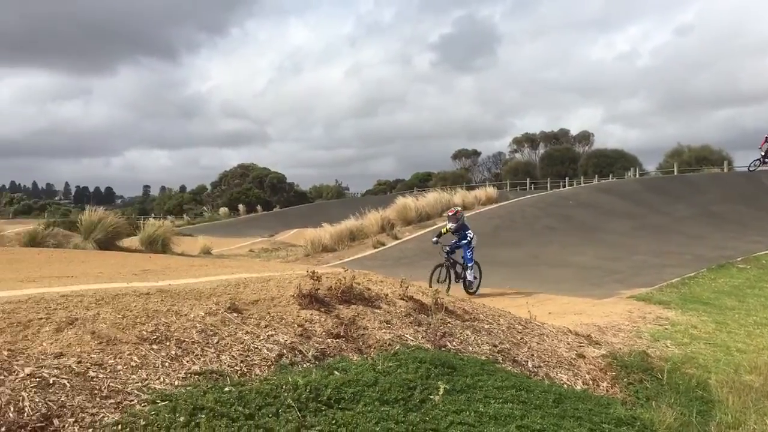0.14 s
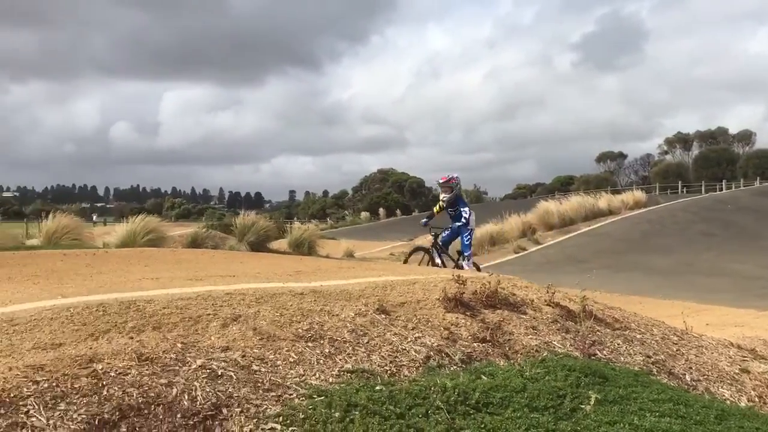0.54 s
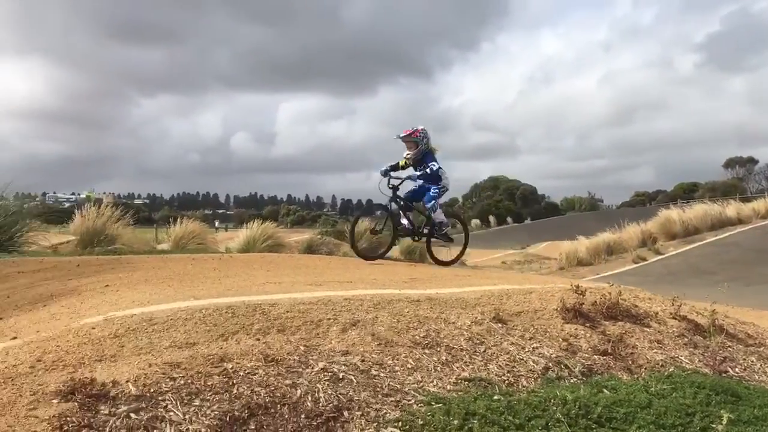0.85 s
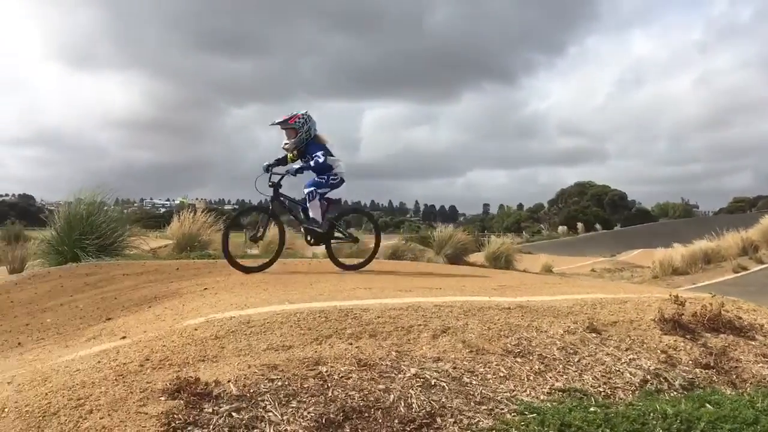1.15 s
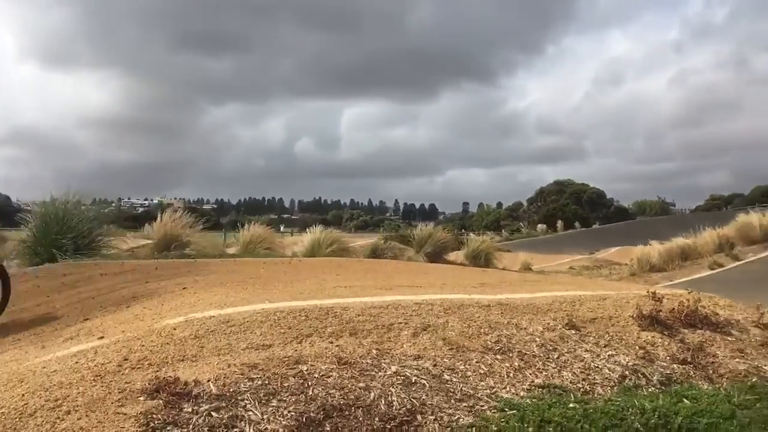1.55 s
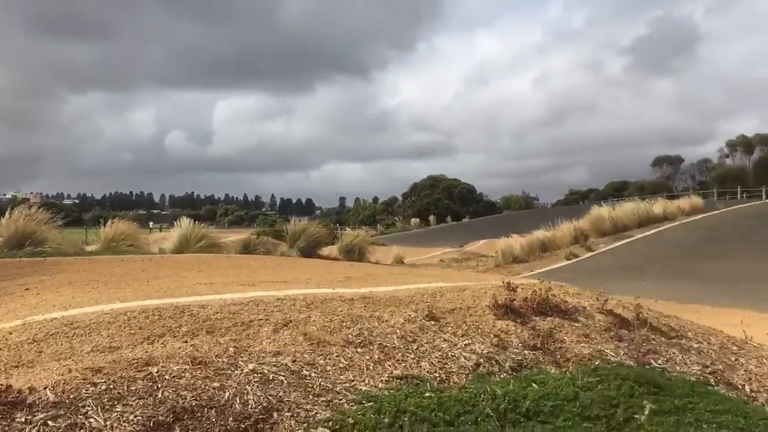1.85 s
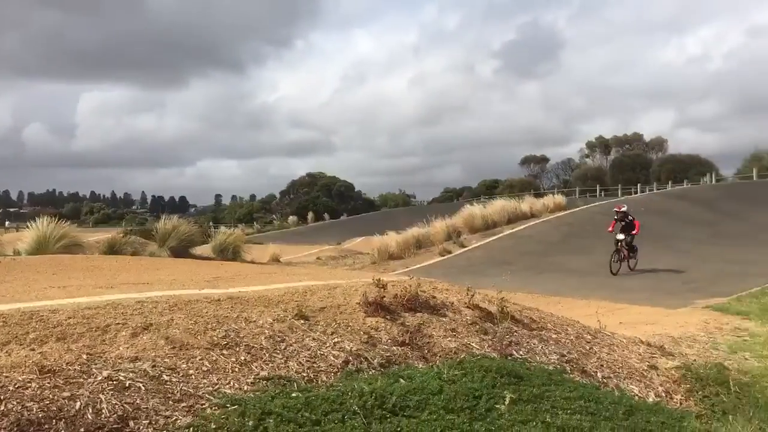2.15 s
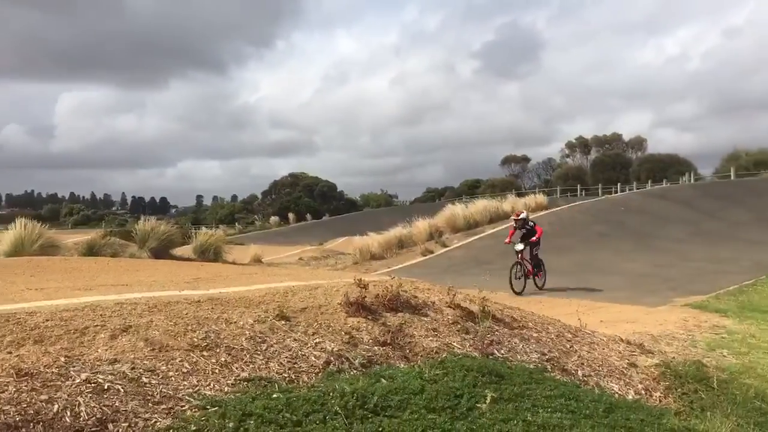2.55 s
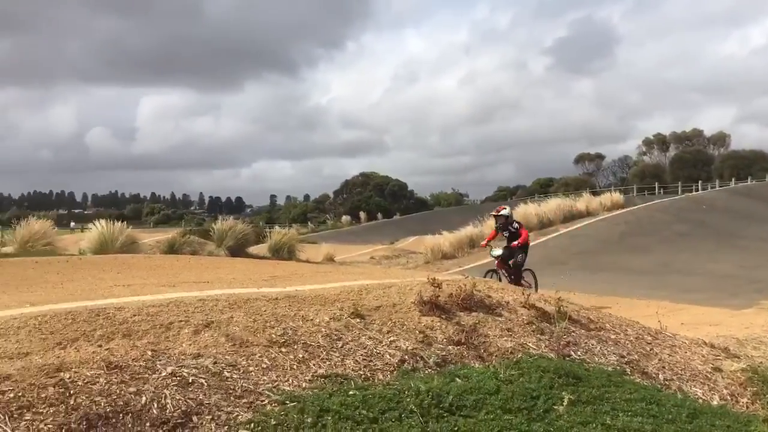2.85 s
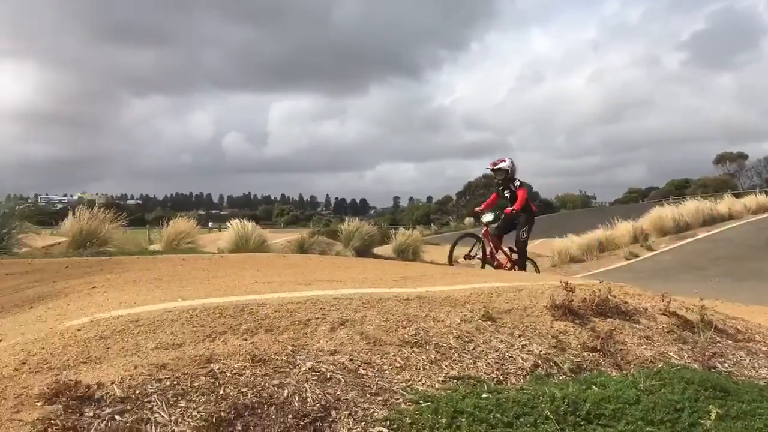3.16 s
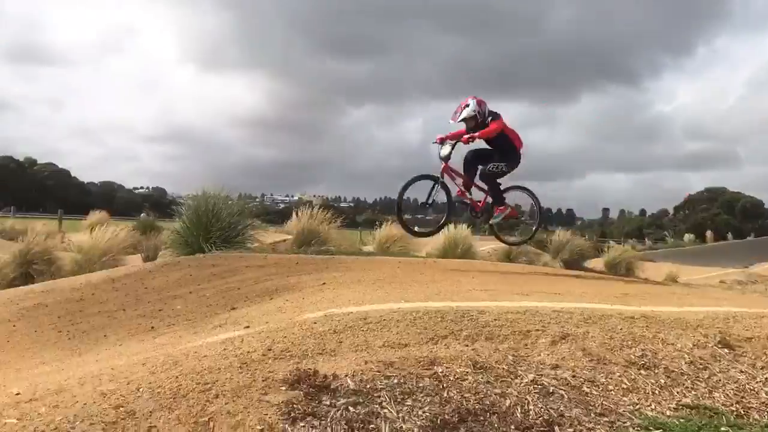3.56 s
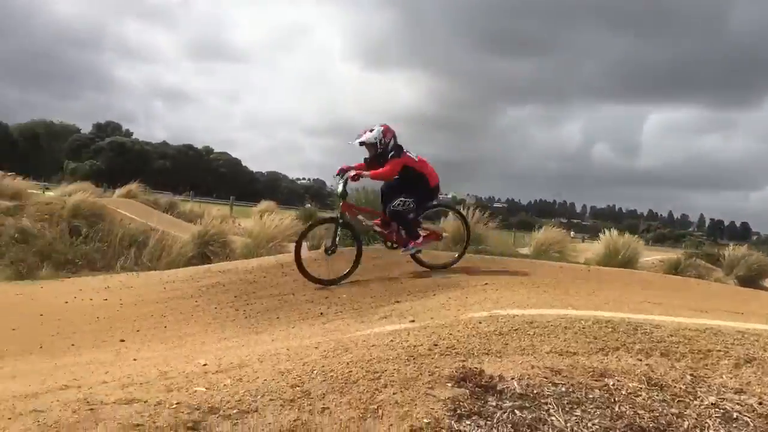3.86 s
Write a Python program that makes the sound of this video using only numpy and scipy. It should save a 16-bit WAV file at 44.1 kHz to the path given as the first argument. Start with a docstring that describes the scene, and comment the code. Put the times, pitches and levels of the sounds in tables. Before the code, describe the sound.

Two bicycles ride a dirt jump one after the other, tyres crunching grit, freewheels buzzing, the second landing with a bright rattle; outdoors, a microphone near the track is buffeted by deep wind.

```python
"""A dirt track with jumps on a windy day: two bicycles roll over it one after the other.
The tyres are coloured noise with grains of grit, and short bursts of noise are snapping stones.
Freewheels are rows of clicks: they buzz, and the first slows to single ticks. Landings crack and ring the frame.
Wind is deep, gusty noise with short buffets and one pop on the microphone, over a soft outdoor hiss."""
import sys
import numpy as np
from scipy import signal
from scipy.fft import rfft, irfft
from scipy.io import wavfile

SR = 44100
rng = np.random.default_rng(int(sys.argv[2]) if len(sys.argv) > 2 else 0)


def put_to_file(sound):
    """Save the sound as 16-bit audio at rate SR, in the file named by the first command-line argument."""
    columns = np.atleast_2d(sound).T  # one column per channel
    safe = np.clip(columns, -1, 1)
    whole_steps = np.round(safe * 32767)
    wavfile.write(sys.argv[1], SR, whole_steps.astype(np.int16))


N = 176400  # samples, 4 s
T = np.arange(N) / SR  # time of every sample [s]


def from_db(db):
    """Turn decibels into a gain."""
    return 10 ** (np.asarray(db) / 20)


def rms_one(x):
    """Scale to an average power of one."""
    return x / np.sqrt(np.mean(x ** 2) + 1e-20)


def in_time(rows):
    """Draw straight lines between the rows of a table, giving each column a value at every sample."""
    times, *columns = np.transpose(rows)
    return [np.interp(T, times, column) for column in columns]


# The microphone's ripples, shared by all coloured noise: (frequency [Hz], relative level [dB])
MICROPHONE = [(330, 2), (450, 0), (620, -0.5), (2300, -1.5), (2850, -2), (3400, 2.5), (4300, 2),
              (4950, -1.5), (6000, 2.5), (6900, -1), (7700, -6.5), (9200, -6), (10400, -14.5),
              (11500, -12.5), (15500, -20.5)]


def colour(x, spectrum):
    """Filter by a spectrum and the microphone's ripples; white noise keeps its power."""
    bin_hz = np.arange(N + 1) * SR / (2 * N)
    log_bins = np.log(np.maximum(bin_hz, 1))
    db = np.zeros(N + 1)
    for table in (spectrum, MICROPHONE):
        hz, level = np.transpose(table)
        db += np.interp(log_bins, np.log(hz), level)
    # twice the length, so that the end does not wrap round to the start
    return irfft(rfft(x, 2 * N) * rms_one(from_db(db)))[:N]


def noise(spectrum):
    """Steady hiss or rumble: random samples shaped by a spectrum."""
    return colour(rng.standard_normal(N), spectrum)


def band(x, low, high, order=2):
    """Keep only the frequencies between low and high [Hz]."""
    return signal.sosfilt(signal.butter(order, [low, high], "band", fs=SR, output="sos"), x)


def low_pass(x, top_hz):
    """Keep the frequencies below top_hz."""
    return signal.sosfilt(signal.butter(2, top_hz, fs=SR, output="sos"), x)


def drift(top_hz):
    """Slow random wandering with a spread of one, no quicker than about top_hz."""
    return rms_one(low_pass(rng.standard_normal(2 * N), top_hz)[N:])  # skip the filter's start


def bursts(rows):
    """Noise that starts at once and dies away, for rows of (time [s], level [dB], time to fall 60 dB [s])."""
    power = np.zeros(N)
    for start, db, t60 in rows:
        age = np.maximum(T - start, 0)
        power += (T >= start) * from_db(db - 60 * age / t60) ** 2
    return np.sqrt(power) * rng.standard_normal(N)


def pings_of(clicks, t60):
    """Each click sets off a burst of noise that falls 60 dB in t60 seconds."""
    fade = np.exp(-np.log(1000) / (t60 * SR))
    loudness = signal.lfilter([1], [1, -fade], clicks + 1e-18)
    return loudness * rng.standard_normal(N)


# Tyres on the track: (time [s], base level of the rolling roar [dB], base level of the gritty hiss [dB])
TYRES = [(0, -58, -60.5), (.4, -53.5, -59), (.7, -57, -54), (1.0, -57, -54.5), (1.14, -53.5, -48.5),
         (1.27, -53, -50), (1.52, -58.5, -53), (1.65, -53, -50.5), (1.78, -48, -45.5), (2.02, -52.5, -46.5),
         (2.17, -56, -51.5), (2.72, -53.5, -55.5), (2.85, -51, -50), (3.1, -50, -56), (3.27, -55, -61.5),
         (3.55, -57.5, -59.5), (3.89, -55, -51)]
# Colours of the roar and the hiss: (frequency [Hz], relative level per Hz [dB])
ROAR = [(200, -0.5), (600, 3), (1200, 5), (2300, 4.5), (3300, -2), (5000, -12.5), (12000, -51)]
HISS = [(1200, -8), (3200, -2), (6500, 1.5), (9000, -4), (15500, -16)]
GRAINS_PER_S, GRAIN_SPREAD_DB, GRAIN_T60_S = 600, 2.8, 0.0089
# shares of smooth noise and of grit, against the base levels
ROAR_SMOOTH_DB, ROAR_GRIT_DB = -2, -6.5
HISS_SMOOTH_DB, HISS_GRIT_DB = -6, -9


def tyres():
    """Rolling rubber roars and hisses smoothly, while randomly timed grains of grit crunch in both."""
    roar_db, hiss_db = in_time(TYRES)
    grain_hits = rng.random(N) < GRAINS_PER_S / SR
    grain_db = GRAIN_SPREAD_DB * np.minimum(rng.exponential(1, N), 4)
    grit = rms_one(pings_of(grain_hits * from_db(grain_db), GRAIN_T60_S))
    roar = from_db(ROAR_SMOOTH_DB) * rng.standard_normal(N) + from_db(ROAR_GRIT_DB) * grit
    hiss = from_db(HISS_SMOOTH_DB) * rng.standard_normal(N) + from_db(HISS_GRIT_DB) * grit
    return from_db(roar_db) * colour(roar, ROAR) + from_db(hiss_db) * colour(hiss, HISS)


# Stones that snap under the tyres: (time [s], level [dB])
STONES = [(1.121, -40), (1.250, -39), (1.262, -41), (1.294, -40), (1.663, -42.5), (1.732, -36.5),
          (1.753, -43), (1.768, -36.5), (1.796, -37), (1.811, -41), (1.843, -40), (1.958, -39),
          (2.011, -39), (2.085, -38)]
# Colour of a snap: (frequency [Hz], relative level per Hz [dB])
STONE_COLOUR = [(300, -6), (1000, 0), (4000, 1), (7000, -1), (15500, -10)]
STONE_T60_S = 0.018  # time to fall 60 dB


def stones():
    """A snapping stone is a burst of noise that starts at once and dies fast."""
    return colour(bursts([(s, db, STONE_T60_S) for s, db in STONES]), STONE_COLOUR)


def pawl_drops(coast, uneven_db=0.5):
    """A pawl (a small catch in the hub) drops once per tooth: slightly uneven clicks while coasting."""
    clicks_per_s, _ = in_time(coast)
    rolling = (T > coast[0][0]) & (T < coast[-1][0])
    teeth_passed = np.floor(np.cumsum(clicks_per_s) / SR)
    drops = np.diff(teeth_passed, prepend=0) * rolling
    return drops * from_db(uneven_db * rng.standard_normal(N))


def at_coast_level(x, coast):
    """Bring a hub's sound to unit power while it coasts, then follow the levels of the coast."""
    _, db = in_time(coast)
    coast_s = coast[-1][0] - coast[0][0]
    return from_db(db) * rms_one(x) * np.sqrt(coast_s * SR / N)


PAWL_T60_S = 0.013  # time for a click to fall 60 dB


def freewheel(coast, hub):
    """Pawl clicks, each a short burst of noise, follow so fast that they buzz."""
    clicks = pings_of(pawl_drops(coast), PAWL_T60_S)
    return colour(at_coast_level(clicks, coast), hub)


# The first bicycle coasts: (time [s], pawl clicks per second, level [dB])
FIRST_COAST = [(.3, 80, -79), (.42, 93, -67), (.7, 121, -66.5), (.8, 140, -59), (.88, 90, -54.5)]
# Its freewheel slows to single ticks: (time [s], level [dB])
TICKS = [(.885, -46), (.896, -46), (.908, -43), (.922, -44), (0.938, -41.5), (0.963, -41.5), (.998, -39.5),
         (1.046, -39), (1.074, -47), (1.090, -38.5), (1.14, -39.5)]
# Colour of its hub: (frequency [Hz], relative level per Hz [dB])
FIRST_HUB = [(1200, -22), (3600, -1.5), (6100, -1), (9100, -0.5), (13700, 4), (15500, -6)]
TICK_T60_S = 0.03  # time to fall 60 dB


def first_freewheel():
    """The first hub buzzes, then its pawl is heard as separate ticks of dying noise."""
    ticks = bursts([(s, db, TICK_T60_S) for s, db in TICKS])
    return freewheel(FIRST_COAST, FIRST_HUB) + colour(ticks, FIRST_HUB)


# The second bicycle coasts nearer: (time [s], pawl clicks per second, level [dB])
SECOND_APPROACH = [(2.14, 42.95, -59), (2.22, 93.2, -56.5), (2.35, 114.7, -60), (2.5, 113.8, -61),
                   (2.7, 102, -64), (2.97, 92.2, -61)]
# Colour of its hub from afar: (frequency [Hz], relative level per Hz [dB])
SECOND_HUB_FAR = [(1200, -15), (5000, -4.5), (5900, 1), (7300, 0.5), (8800, 8), (9400, 1.5), (13300, 6.5),
                  (15500, -7)]


def second_approach():
    """The second hub buzzes with bursts of noise at every pawl click."""
    return freewheel(SECOND_APPROACH, SECOND_HUB_FAR)


# Tones the second hub rings with: (frequency [Hz], relative level [dB])
HUB_MODES = [(3300, -6.5), (3800, -8), (4480, -8), (5220, -9), (6280, -1), (6650, -3.5), (7050, -10),
             (10770, -14)]
HUB_T60_S, HUB_CONTACT_T60_S = 0.02, 0.006  # fall by 60 dB: of the ring, of the noise that excites it
HUB_WAVER_DB, HUB_WAVER_TOP_HZ = 2, 12


def hub_ring(coast):
    """Each pawl click excites the tones of the hub, whose strengths waver."""
    decay = from_db(-60 / (HUB_T60_S * SR))  # per sample
    drops = pawl_drops(coast)
    ring = np.zeros(N)
    for hz, db in HUB_MODES:
        turn = 2 * np.pi * hz / SR  # radians per sample
        waver = from_db(HUB_WAVER_DB * drift(HUB_WAVER_TOP_HZ))
        strike = pings_of(drops, HUB_CONTACT_T60_S)
        resonator = [1, -2 * decay * np.cos(turn), decay * decay]
        ring += waver * signal.lfilter([0, from_db(db) * np.sin(turn)], resonator, strike)
    return at_coast_level(ring, coast)


# The second bicycle jumps: (time [s], pawl clicks per second, base level [dB])
SECOND_JUMP = [(3.28, 159.7, -65), (3.43, 157.8, -53), (3.49, 136.2, -55), (3.62, 125.4, -54.5),
               (3.77, 120.5, -52), (3.84, 128.6, -49), (3.91, 137.7, -50)]
# Colour of its hub close by: (frequency [Hz], relative level per Hz [dB])
SECOND_HUB_NEAR = [(2000, -26), (3500, -3), (5500, -12), (7500, 1.5), (10200, 3), (15500, -6)]
HUB_CLICK_DB, HUB_RING_DB = -8, -2  # against the base level


def second_jump():
    """Close by, the hub's pawl clicks are mixed with its ringing tones."""
    clicks = freewheel(SECOND_JUMP, SECOND_HUB_NEAR)
    return from_db(HUB_CLICK_DB) * clicks + from_db(HUB_RING_DB) * hub_ring(SECOND_JUMP)


# Landings and rattles of chain and frame: (time [s], level [dB], time to fall 60 dB [s],
# top of the crack [Hz], ring against crack [dB])
KNOCKS = [(1.2155, -29.5, 0.036, 5160, -5.5), (3.909, -35.5, .089, 6000, -17),
          (3.917, -31.5, 0.077, 14000, -14), (3.929, -32.5, 0.15, 14000, -20),
          (3.971, -37.5, 0.15, 14000, -11)]
# Colour of the crack: (frequency [Hz], relative level per Hz [dB])
FRAME = [(200, -4), (1150, 6), (1700, 4.5), (2300, 3.5), (4000, 3), (6000, 1.5), (7000, 5), (15500, 3.5)]
# Tones a bicycle frame rings with: (frequency [Hz], relative level [dB], time to fall 60 dB [s])
FRAME_MODES = [(1141, -7, .075), (1680, -13, .06), (2300, -5, .05), (3644, -3, .07), (4081, -5, .05),
               (5895, 2, .023)]


def knocks():
    """Each knock is a crack of noise, duller or brighter, that sets the frame's dying tones ringing."""
    cracks, ring = np.zeros(N), np.zeros(N)
    for start, db, t60, top_hz, ring_db in KNOCKS:
        cracks += low_pass(bursts([(start, db, t60)]), top_hz)
        age = np.maximum(T - start, 0)
        for hz, mode_db, mode_t60 in FRAME_MODES:
            strength = from_db(db + ring_db + mode_db + rng.standard_normal())  # varies by about 1 dB
            fade = np.exp(-np.log(1000) * age / mode_t60)
            ring += strength * fade * np.sin(2 * np.pi * hz * age)
    return colour(cracks, FRAME) + ring


# Thin metallic pings: (time [s], level [dB], time to fall 60 dB [s])
PINGS = [(.045, -51, .023), (3.36, -48.5, 0.065)]


def metal_pings():
    """Thin pings: dying bursts of noise in the colour of the second hub."""
    return colour(bursts(PINGS), SECOND_HUB_FAR)


def bikes():
    """Tyres, stones, freewheels, landings and small rattles together."""
    freewheels = first_freewheel() + second_approach() + second_jump()
    return tyres() + stones() + freewheels + knocks() + metal_pings()


SWELL_S = 0.04  # half the length of the averaging window


def steady(x):
    """Even out the slow swells of a noise by dividing by its loudness around each moment."""
    window = np.hanning(int(2 * SWELL_S * SR))
    local_power = signal.fftconvolve(x ** 2, window / window.sum(), "same")
    return x / np.sqrt(local_power + 1e-9)


# Wind on the microphone: (time [s], base level [dB])
WIND = [(0, -35.5), (.12, -25), (.27, -35), (.36, -25.5), (.5, -22), (.62, -33.5), (1.09, -32.5),
        (1.19, -47.5), (1.33, -23.5), (1.5, -35.5), (1.6, -41), (1.75, -35.5), (1.86, -50), (2.02, -25.5),
        (2.15, -35), (2.62, -35), (2.8, -35), (2.9, -38), (3.12, -37), (3.47, -46), (3.66, -31),
        (3.75, -36.5), (3.85, -32), (4.0, -28.5)]
# Colours of the deep rumble and the flutter above it: (frequency [Hz], relative level per Hz [dB])
RUMBLE = [(20, -43), (31, -23), (45, -3), (70, 2), (100, -8.5), (140, -7.5), (220, -32), (500, -74)]
FLUTTER = [(60, -30.5), (150, 2.5), (230, -5), (320, -9), (440, -24.5), (650, -22), (950, -41),
           (3000, -44.5)]
RUMBLE_DB, FLUTTER_DB = 1.5, -10  # against the base level
EDDY_DB, EDDY_TOP_HZ = -2.5, 27  # random lumps of the flutter: spread and quickest rate
GUST_DB, GUST_TOP_HZ = 3, 9.9  # random gusts around the base level: spread and quickest rate


def wind():
    """Moving air gives a deep rumble and a lumpy flutter, both following the gusts."""
    wind_db, = in_time(WIND)
    rumble = from_db(RUMBLE_DB) * steady(noise(RUMBLE))
    lumps = from_db(EDDY_DB * drift(EDDY_TOP_HZ))
    flutter = from_db(FLUTTER_DB) * steady(noise(FLUTTER) * lumps)
    gusts = from_db(wind_db + GUST_DB * drift(GUST_TOP_HZ))
    return gusts * (rumble + flutter)


# Eddies (small whirls of air) that hit the microphone:
# (time [s], level [dB], half length [s], pitch of the swirl [Hz])
BUFFETS = [(0.066, -23.5, 0.0045, 141), (0.335, -21, .006, 171), (0.357, -14, 0.0082, 149),
           (0.407, -18, .012, 200), (0.477, -14, 0.0067, 115), (.523, -24, 0.0069, 137),
           (0.567, -20, 0.005, 88), (0.721, -26, 0.017, 169), (1.032, -26, 0.0069, 132),
           (1.334, -20.5, 0.017, 84), (1.421, -27, 0.014, 272), (1.458, -21.5, 0.0068, 163),
           (1.545, -25, 0.018, 81), (1.66, -24, 0.004, 126), (1.949, -23, .011, 188),
           (2.031, -18.5, 0.015, 100), (2.06, -27, 0.03, 142), (2.479, -29.5, 0.007, 145),
           (2.572, -30.5, 0.029, 159), (2.777, -26, 0.016, 162), (3.083, -26.5, 0.01, 151),
           (3.202, -27.5, .012, 125), (3.563, -28, 0.0058, 123), (3.609, -21.5, 0.0072, 145),
           (3.7, -20.5, 0.0071, 160), (3.864, -24, .012, 136)]
SWIRL_LOW, SWIRL_HIGH = 0.542, 1.268  # edges of a swirl, as shares of its pitch
SKIRT_LOW, SKIRT_HIGH = 1.11, 3.37  # edges of the brighter noise around it, as shares of its pitch
SWIRL_SKIRT_DB, SKIRT_DB_PER_DB = -7, 0.57  # stronger eddies are brighter


def buffets():
    """Each eddy is a short swell of low turbulent noise, brighter when stronger."""
    out = np.zeros(N)
    for centre, db, half_s, hz in BUFFETS:
        core = band(rng.standard_normal(N), SWIRL_LOW * hz, SWIRL_HIGH * hz, order=3)
        skirt = band(rng.standard_normal(N), SKIRT_LOW * hz, SKIRT_HIGH * hz, order=3)
        swirl = core + from_db(SWIRL_SKIRT_DB + SKIRT_DB_PER_DB * db) * skirt
        swell = np.exp(-.5 * np.minimum(np.abs(T - centre) / half_s, 10) ** 2)
        # bring the swirl to unit power within its swell
        to_unit_power = np.sqrt(np.sum(swell ** 2) / np.sum((swell * swirl) ** 2))
        out += from_db(db) * swell * swirl * to_unit_power
    return out


POP_AT_S, POP_HALF_S, POP_HZ, POP_DB = 0.468, 0.0016, 190, -1.5
WAKE_DB, WAKE_T60_S = -17, 0.032  # wake against the pop, time to fall 60 dB


def pop():
    """One hard eddy pops on the diaphragm: a swing of suction and pressure, with turbulence in its wake."""
    age = T - POP_AT_S
    swing = np.sin(2 * np.pi * POP_HZ * age) * np.exp(-.5 * (age / POP_HALF_S) ** 2)
    wake = bursts([(POP_AT_S - POP_HALF_S, POP_DB + WAKE_DB, WAKE_T60_S)])
    # (frequency [Hz], relative level per Hz [dB])
    wake_colour = [(150, -24), (340, -5), (700, -1.5), (1000, -13.5), (1700, -25.5), (3000, -49), (5000, -70)]
    return from_db(POP_DB) * swing + colour(wake, wake_colour)


# Colour of still outdoor air: (frequency [Hz], relative level per Hz [dB])
AIR = [(150, 3.5), (600, 10), (1000, 0.5), (2000, -3.5), (4000, -17.5), (15500, -5)]
AIR_DB = -54


def air():
    """Still outdoor air is a soft, steady noise."""
    return from_db(AIR_DB) * noise(AIR)


def scene():
    """Bicycles, wind and air at one microphone."""
    return (bikes() + wind() + buffets() + pop() + air())[None]


CUTOFF_HZ = 15800


def record(dry):
    """Cut the top of the treble steeply."""
    steep_cut = signal.ellip(10, .2, 80, CUTOFF_HZ, fs=SR, output="sos")  # 0.2 dB ripple, 80 dB down
    return signal.sosfilt(steep_cut, dry)


dry = scene()
out = record(dry)
put_to_file(out)
```